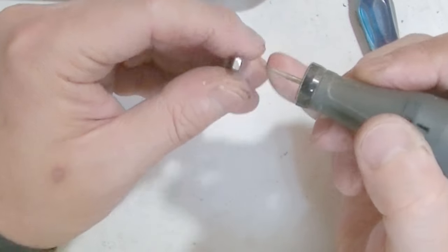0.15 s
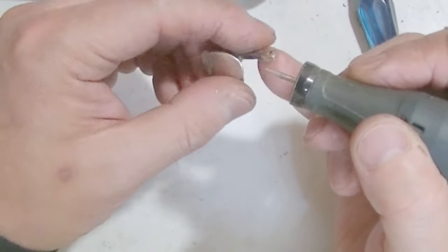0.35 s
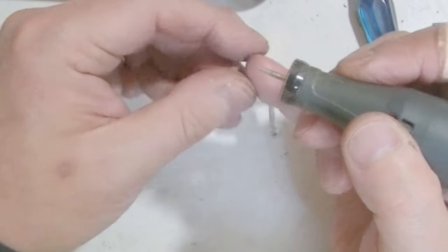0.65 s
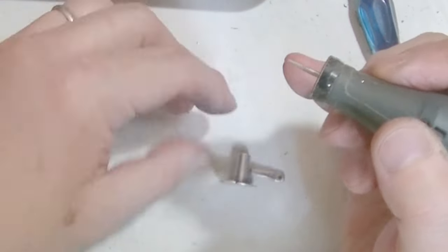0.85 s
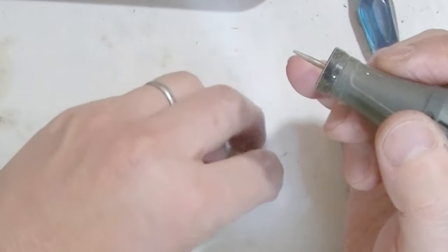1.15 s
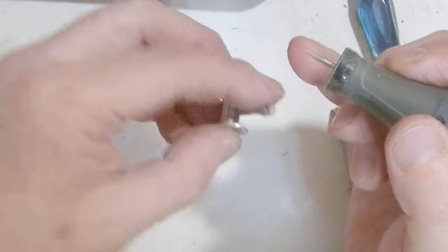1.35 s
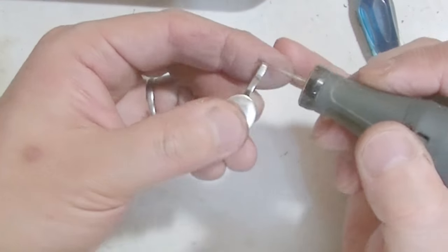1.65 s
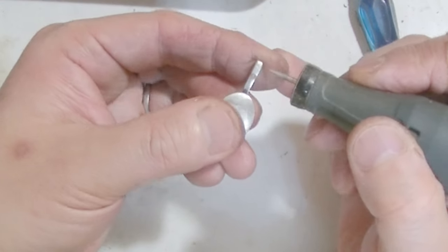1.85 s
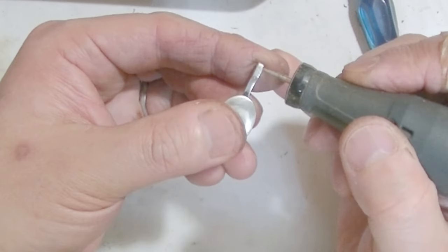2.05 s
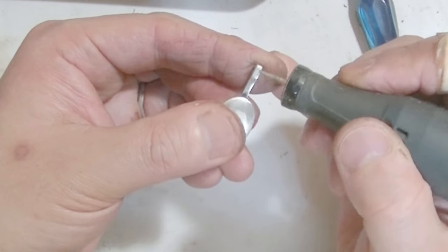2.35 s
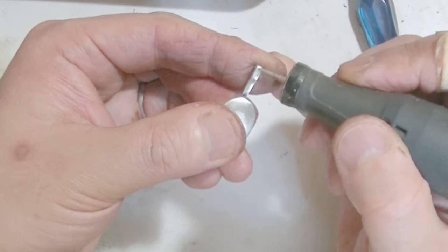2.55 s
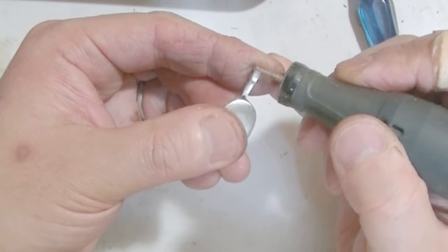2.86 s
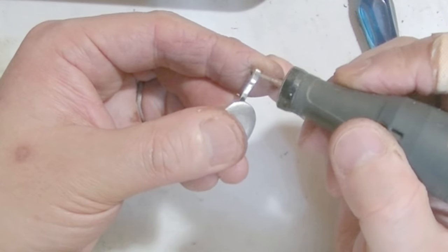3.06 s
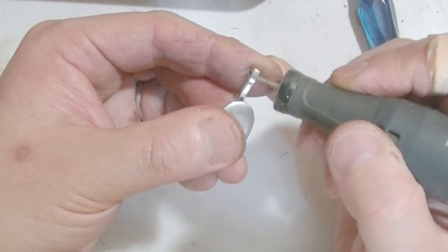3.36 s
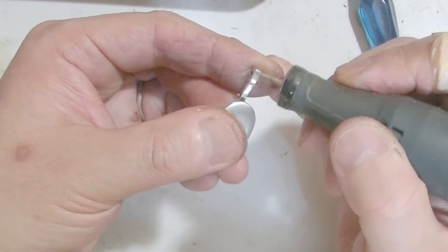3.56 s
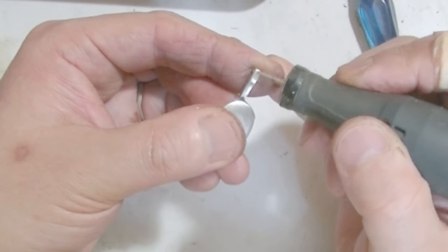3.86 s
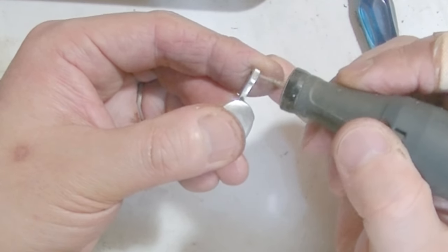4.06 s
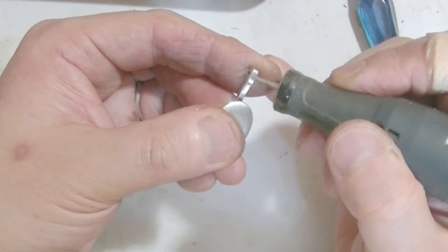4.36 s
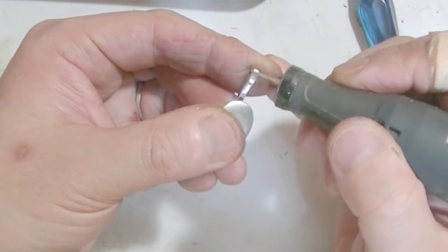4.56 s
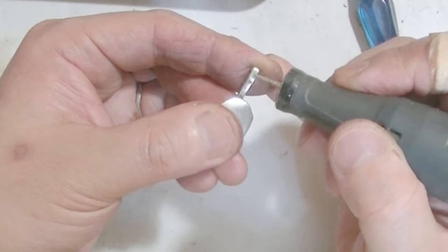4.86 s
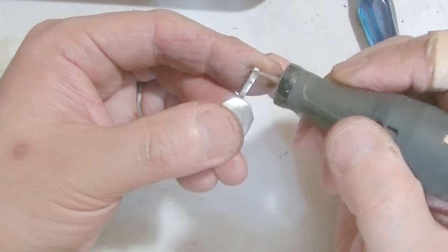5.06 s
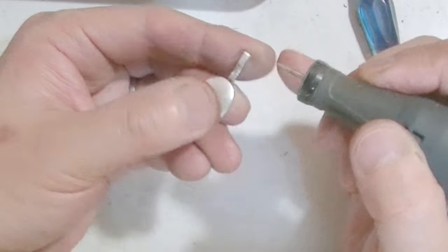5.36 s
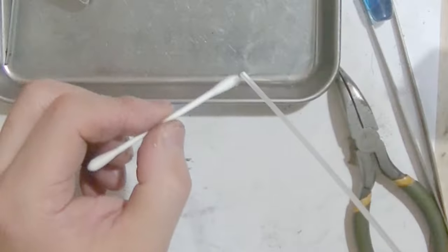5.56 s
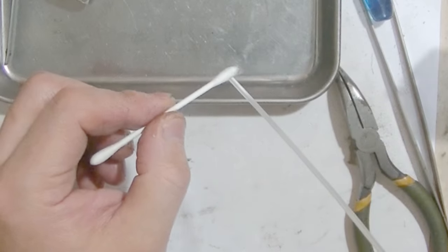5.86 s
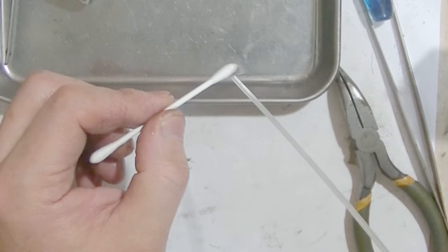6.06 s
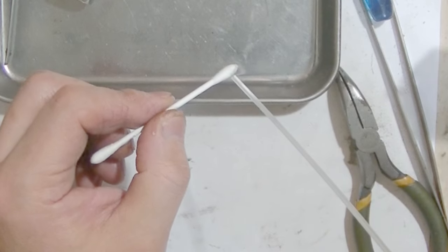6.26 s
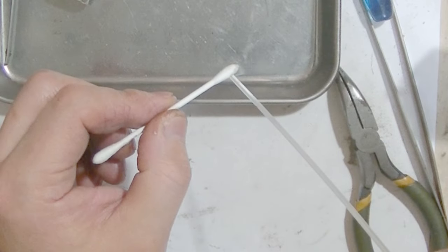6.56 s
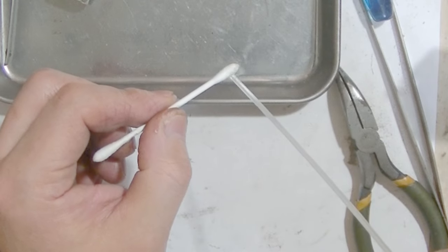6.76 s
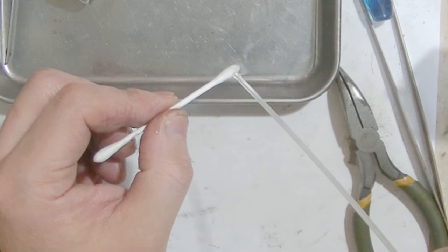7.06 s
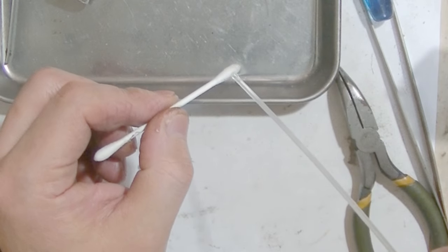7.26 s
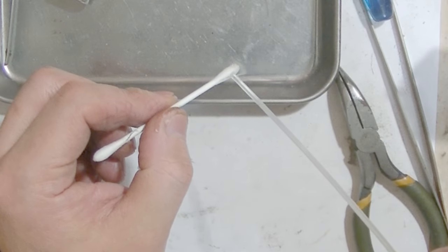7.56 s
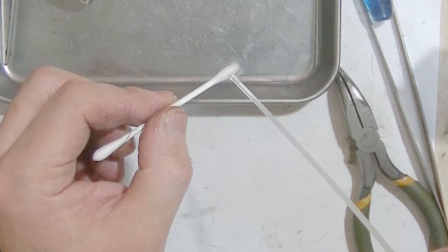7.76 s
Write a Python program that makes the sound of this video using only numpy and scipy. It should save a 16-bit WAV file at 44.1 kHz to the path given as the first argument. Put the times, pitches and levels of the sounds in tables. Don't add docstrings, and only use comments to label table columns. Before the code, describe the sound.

Close, dry workshop sound: a steady, high, many-toned motor whine with airy hiss and rattling bites of metal. Early on a small part falls, ticking and ringing briefly on a hard bench. The whine carries on, wavering slightly under pressure, then stops suddenly at a scene change. Soft cloth and a faint thud follow, then low hum and hush, and finally irregular scratchy, fizzing stick-slip rubbing with sharp little spits and snaps.

```python
import sys
import numpy as np
from scipy import signal
from scipy.fft import rfft, irfft
from scipy.io import wavfile
from scipy.ndimage import uniform_filter1d

SR = 44100
rng = np.random.default_rng(int(sys.argv[2]) if len(sys.argv) > 2 else 0)


def gain_from_db(level_db):
    decades = np.asarray(level_db, float) / 20
    return 10 ** decades


def generate_wav(signal):
    frames = np.transpose(np.atleast_2d(signal))
    scaled = np.clip(frames, -1, 1) * 32767
    pcm = np.round(scaled).astype(np.int16)
    wavfile.write(sys.argv[1], SR, pcm)


N = 349272
STEP = 64


def evened(x):
    return x / np.sqrt(np.mean(x ** 2) + 1e-20)


def read(points, hz):
    f, value = np.transpose(points)
    return np.interp(np.log(hz + 1), np.log(f + 1), value)


def curves(rows, outside=None):
    s, *columns = np.transpose(rows)
    return [np.interp(np.arange(N) / SR, s, c, outside, outside) for c in columns]


def fine(x):
    return np.interp(np.arange(N) / STEP, np.arange(len(x)), x)


def slow(hz, count):
    steps = rng.standard_normal((count, N // STEP + 1))
    b, a = signal.butter(1, hz * 2 * STEP / SR)
    return evened(signal.filtfilt(b, a, steps, padtype="even"))


def hump(t, centre, length):
    return np.cos(np.pi * np.clip((t - centre) / length, -.5, .5)) ** 2


def swells(s, length, height):
    t = np.arange(N // STEP + 1)[:, None] * STEP / SR
    return fine((height * hump(t, s, length)).sum(axis=1))


def colour(x, points):
    return irfft(rfft(x) * gain_from_db(read(points, np.fft.rfftfreq(N, 1 / SR))), N)


def pair(points, same):
    a, b = rfft(rng.standard_normal((2, N)))
    hz = np.fft.rfftfreq(N, 1 / SR)
    same = np.clip(same + 0.48 / (1 + (hz / 55) ** 2), 0, 1)
    both = np.array([a, same * a + np.sqrt(1 - same ** 2) * b])
    return evened(irfft(both * gain_from_db(read(points, hz)), N))


def resonate(x, hz, width):
    r = np.exp(-np.pi * width / SR)
    return signal.lfilter([1 - r, 0, r - 1], [1, -2 * r * np.cos(2 * np.pi * hz / SR), r * r], x)


def ring(modes, spread, pitch=1):
    t = np.arange(SR // 8) / SR
    x = np.zeros(len(t))
    for hz, db, t60 in modes:
        level = gain_from_db(db + spread * rng.standard_normal() - 60 * t / t60)
        x += level * np.sin(2 * np.pi * hz * pitch * rng.uniform(0.96, 1.01) * t)
    return x / abs(x).max()


def snap(hz, t60):
    puff = rng.standard_normal(SR // 16) * gain_from_db(-60 * np.arange(SR // 16) / SR / t60)
    puff = resonate(puff, hz, .5 * hz) + resonate(puff, 0.23 * hz, 0.077 * hz)
    puff = resonate(puff, 1.05 * hz, 2 * hz)
    return puff / abs(puff).max()


def add(mix, s, sound):
    part = mix[round(s * SR):][:len(sound)]
    part += sound[:len(part)]


def ports(x, side):
    smear = rng.standard_normal(2400) * np.exp(-np.arange(2400) / 500)
    smeared = signal.oaconvolve(x, smear / np.linalg.norm(smear))[:N]
    return x + colour(smeared, side) * np.array([[1], [-1]])


def walls(x, t60):
    t = np.arange(SR // 4) / SR
    tail = rng.standard_normal((2, len(t))) * gain_from_db(-60 * t / t60) * (t > .002)
    return signal.fftconvolve(x[None], tail / np.linalg.norm(tail[0]), axes=1)[:, :N]


def hum(lines, width):
    t = np.arange(N) / SR
    out = 0
    for hz, db in lines:
        level = fine(gain_from_db(db + 4.5 + 2.0 * slow(width, count=1)[0]))
        out = out + level * np.sin(2 * np.pi * (hz * t + rng.random((2, 1)) * 0.43))
    return out


# time_s, speed_hz (turns a second)
SHAFT_SPEED = [(0, 409.3), (0.13, 409.7), (0.2, 412.1), (0.35, 413.0), (1.52, 413.1), (1.62, 411.4),
               (2.25, 411.4), (2.45, 409.6), (2.65, 410.9), (2.95, 412.3), (3.3, 413.3), (3.95, 413.5),
               (4.35, 410.2), (4.6, 413.3), (4.95, 412.5), (5.1, 411.1), (5.35, 413.8), (5.55, 414.6)]
# centre_s, length_s, rattle_db, shank_ring_db, speed_sag_hz
BITES = [(0.041, 0.17, 7, 7, -1.5), (0.111, 0.087, 12, -4, 2), (2.366, 0.14, 8, -0.5, 2.5),
         (2.408, 0.063, 4, -1, 1), (2.53, 0.13, 6, -4, 1.36), (2.678, 0.16, 6, 4, -1.5),
         (2.765, 0.14, 6.5, 0, 3.5), (3.089, 0.097, 5, -11, 1.5), (3.475, 0.14, 8, 5, -0.36),
         (3.532, 0.15, -2, -3, 3), (3.743, 0.18, 6.5, -2, 2.5), (4.056, .1, 3, -1, -0.5),
         (4.161, 0.17, 3, -8, 2), (4.506, 0.18, 6.5, 10, 1.83), (5.053, 0.09, 5.5, 4, 2),
         (5.125, 0.18, 10, 5.5, 0.8), (5.267, 0.1, 3, 2, 2)]


def shaft():
    s, length, rattle_db, ring_db, sag_hz = np.transpose(BITES)
    speed = curves(SHAFT_SPEED)[0] - swells(s, length, sag_hz)
    turns = np.cumsum(speed) / SR + .0018 * fine(slow(35, count=1)[0])
    return speed, turns, swells(s, length, rattle_db), swells(s, length, ring_db)


# centre_s, level_db
SONGS = [(.1, -7), (3.09, -3), (3.18, 2), (3.54, 5), (3.73, 4), (4.07, 4), (4.18, -2), (4.29, 0.5),
         (4.41, 4), (4.78, 7.5), (5.0, 3.5), (5.19, 3.5), (5.28, 0), (5.48, 3.5)]


def strain(speed, ring_db, working):
    free_hz, song_s, turn_away_s = 413, .13, 2.3
    s, db = np.transpose(SONGS)
    turned_s = np.maximum(np.arange(N) / SR - turn_away_s, 0)
    sag_hz = (free_hz - speed) * working
    return np.array([sag_hz, ring_db, swells(s, song_s, db), turned_s, working])[:, ::STEP]


# centre_s, length_s, order, level_db
ORDER_SWINGS = [(0.065, 0.09, 8, 5.0), (0.075, 0.06, 12, -12.5), (0.12, 0.06, 12, 6.0), (0.135, 0.45, 9, 4.2),
                (0.165, 0.06, 12, -14.0), (0.254, 0.45, 18, -5.2), (0.294, 0.06, 17, 11.0),
                (0.344, 0.45, 5, -10.7), (0.554, 0.3, 18, -7.4), (1.078, 0.45, 17, 5.9), (1.482, 0.3, 18, 4.9),
                (1.596, 0.3, 14, 8.7), (1.816, 0.09, 18, 7.2), (2.04, 0.06, 18, 11.0), (2.34, 0.12, 11, 3.0),
                (2.34, 0.45, 11, 8.4), (2.439, 0.09, 12, -10.6), (2.454, 0.45, 10, -7.0),
                (2.464, 0.06, 11, -14.0), (2.5, 0.45, 8, 3.0), (2.619, 0.45, 11, 6.5), (2.679, 0.06, 20, -14.0),
                (2.769, 0.3, 10, -5.3), (2.779, 0.2, 12, -7.1), (2.78, 0.09, 8, 5.0), (2.928, 0.06, 12, -12.5),
                (2.968, 0.45, 11, 7.5), (3.003, 0.06, 10, -14.0), (3.128, 0.09, 10, -11.3),
                (3.263, 0.06, 10, -11.3), (3.357, 0.06, 11, 11.0), (3.497, 0.2, 12, -6.6),
                (3.512, 0.45, 10, -3.5), (3.642, 0.45, 18, -8.0), (3.712, 0.06, 14, -14.0),
                (3.761, 0.06, 10, -14.0), (4.141, 0.14, 14, 9.3), (4.156, 0.45, 11, 8.1),
                (4.215, 0.06, 10, -11.1), (4.27, 0.45, 9, 6.4), (4.335, 0.06, 11, 11.0), (4.395, 0.3, 7, -10.2),
                (4.41, 0.06, 11, 11.0), (4.425, 0.45, 12, -8.1), (4.739, 0.2, 10, -7.1), (4.754, 0.3, 5, -9.3),
                (5.078, 0.45, 11, 9.7), (5.138, 0.2, 12, -7.4), (5.358, 0.45, 17, 6.2), (5.433, 0.09, 14, -14.0)]


def swings_db(order, count):
    t = np.arange(count) * STEP / SR
    db = np.zeros(count)
    for centre, length, caught, gain_db in ORDER_SWINGS:
        if caught == order:
            db += 1.1 * gain_db * hump(t, centre, length)
    return db


# order, running_free_db, hand_closing_db, working_db
ORDER_LEVELS = [(1, -67, -70, -69), (2, -73, -73, -75), (3, -52, -52, -51), (4, -54, -53, -54),
                (5, -62, -75, -59), (6, -68, -65, -62), (7, -59, -62, -58), (8, -49, -49, -48),
                (9, -57, -53, -53), (10, -47, -47, -46), (11, -47, -56, -53), (12, -50, -55, -53),
                (13, -56, -75, -58), (14, -61, -50.5, -55), (15, -52, -51, -58), (16, -54, -55, -58),
                (17, -52, -51, -53), (18, -50, -48, -58), (19, -51, -53, -57), (20, -62, -57, -61),
                (21, -61, -61, -61), (22, -60, -58, -62), (23, -55, -61, -64), (25, -59, -63, -72),
                (30, -61, -58, -62), (33, -55, -58, -61), (34, -57, -58, -58), (35, -60, -54, -56),
                (36, -56, -49, -52)]
# order, sag_db_per_hz, ring_share, song_share, turning_db_per_s, working_db
ORDER_ANSWERS = [(5, 0.3, 0.24, 1.47, 0, 1.5), (7, 1.7, 0.74, 0, 1, -6), (8, .5, 0.99, 0.067, -0.36, -1.3),
                 (9, 2, 1, 0, -2, -3), (10, 0.4, -0.72, 1.4, 0.2, -2), (11, -0.5, 0.99, 0.69, -3.5, 1.5),
                 (12, 1.2, 0.024, 0.33, -0.5, 1), (14, 1, 0.33, 0.85, 0, -1.5)]


def whine(turns, grip, working, effort):
    grip, working = grip[::STEP], working[::STEP]
    levels = {round(row[0]): row[1:] for row in ORDER_LEVELS}
    answers = {round(row[0]): row[1:] for row in ORDER_ANSWERS}
    out, wander = np.zeros(N), slow(14, count=38)[:, :len(grip)]
    wander[4] = wander[9]
    wave, spin = 1, np.exp(2j * np.pi * turns)
    for order, w in enumerate(wander, 1):
        loose_db = .5 if order == 3 else 1.3 + .3 * working
        db = np.interp(grip, np.arange(3), levels[order]) if order in levels else -73
        db = db + loose_db * w + 0.042 * order + swings_db(order, len(grip))
        if order in answers:
            db = db + np.dot(answers[order], effort) + 0.17
        wave = wave * spin
        out += np.sqrt(2) * fine(gain_from_db(db)) * (wave * np.exp(2j * np.pi * rng.random())).imag
    return out


# pitch_hz, level_db (per Hz)
OPEN_HISS = [(500, -28.5), (1050, -28), (1450, -11), (1850, -4.5), (2300, -13), (2650, -15), (2900, -10.5),
             (3100, -5), (3800, 1.5), (5500, 1.5), (6200, 0), (7300, 1), (8800, 3), (10500, -1.5),
             (13500, -1), (15700, -4)]
# pitch_hz, level_db (per Hz)
SHADED_HISS = [(1000, -26), (1450, -8), (1850, -2), (2300, -10.5), (2620, -12.5), (2900, -9), (3100, -5.5),
               (3600, 2), (5300, 3), (6100, 0.5), (8100, 4), (10300, 0), (11600, 4), (13100, -2),
               (14700, 2.5), (15700, -0.5)]


def air_hiss(turns, grip, working):
    flutter = 1 + 0.15 * np.cos(2 * np.pi * turns)
    white = rng.standard_normal(N) * flutter * gain_from_db(0.77 * fine(slow(26, count=1)[0]))
    shaded = uniform_filter1d(np.clip(grip, 0, 1), size=4000)
    hiss = (1 - shaded) * evened(colour(white, OPEN_HISS))
    hiss += shaded * gain_from_db(0.46) * evened(colour(white, SHADED_HISS))
    housing = 1.3 * resonate(white, 7450, 500) * (1 - working)
    housing += .9 * resonate(white, 8150, 500) * shaded
    return hiss + housing


# pitch_hz, width_hz, level_db
PART_TONES = [(2140, 92, -1), (3490, 850, 3.5), (4270, 520, 5.5), (4670, 1400, -8)]


def part_rattle(turns):
    grinding = 0.85 * rng.standard_normal(N) * np.exp(-(turns % 1) / 0.43)
    blows = 3.3 * np.diff(np.floor(turns), prepend=0)
    knocks = (grinding + blows) * gain_from_db(2.0 * fine(slow(55, count=1)[0]))
    return evened(sum(gain_from_db(db) * resonate(resonate(knocks, hz, w), hz, w) for hz, w, db in PART_TONES))


# time_s, grip (0 free, 1 hand closing in, 2 working)
GRIP = [
    (0, 2),
    (.13, 2),
    (.16, 0),
    (1.56, 0),
    (1.72, 1),
    (2.17, 1),
    (2.25, 2),
    (5.6, 2),
]


def tool():
    speed, turns, force_db, ring_db = shaft()
    grip = curves(GRIP)[0]
    working = np.clip(grip - 1, 0, 1)
    out = whine(turns, grip, working, strain(speed, ring_db, working))
    out += gain_from_db(-35 + 0.22 * force_db) * air_hiss(turns, grip, working)
    return out + working * gain_from_db(-47.5 + force_db) * part_rattle(turns)


# pitch_hz, side_level_db
TOOL_SIDES = [(300, -21), (1500, -27), (2600, -23), (4500, -19.5), (8000, -18), (10500, -21.5),
              (13000, -8.5), (15500, -4.5)]


def heard_at_tool(x):
    return ports(x, TOOL_SIDES)


# pitch_hz, level_db (per Hz)
TOOL_ROOM = [(12, -59), (30, -20), (50, -9), (145, -9.5), (199, -6.5), (352, -7), (460, -2), (813, -3.5),
             (900, -5.5), (1100, 0), (1430, -52), (2420, -120)]
# pitch_hz, level_db
TOOL_HUM = [(102.3, -86), (199.2, -74.5), (301.5, -78.5)]


def tool_room():
    return gain_from_db(-65.5) * pair(TOOL_ROOM, 0.066) + hum(TOOL_HUM, 19.0)


# start_s, peak_db, knock_db, thud_db, ring_pitch (factor)
BOUNCES = [
    (0.7039, -9, -21, -54, 1.04),
    (0.7649, -16.5, -22.5, -71.5, 1),
    (0.7878, -16, -27.5, -66, 0.76),
    (0.8145, -12.5, -36, -74, 0.91),
    (0.9134, -10.5, -36, -55.5, 1.14),
]
# pitch_hz, level_db, t60_s
BENCH_TONES = [(560, -6.5, 0.046), (806, -3, 0.049), (1088, 5.5, 0.023), (1268, 8, 0.033), (1590, -12, .05),
               (1965, 8, 0.045), (2060, -5, 0.043)]
# pitch_hz, level_db, t60_s
LOOSE_PART_TONES = [(2750, -10, .02), (3110, 2, 0.023), (4280, 3, 0.016), (5000, -0.5, 0.01),
                    (5400, -8, 0.011), (6700, -1, 0.01), (9700, 1, 0.0098)]


def bounces():
    out, thuds = np.zeros((2, N))
    t = np.arange(SR // 8) / SR
    bright = signal.butter(4, 2500, "high", fs=SR, output="sos")
    for s, peak_db, knock_db, thud_db, pitch in BOUNCES:
        scatter, crack = rng.standard_normal((2, len(t)))
        scatter = resonate(scatter, 1630, 1500) * gain_from_db(-60 * t / 0.066)
        add(out, s + 0.00098, gain_from_db(knock_db + 5.5) * (ring(BENCH_TONES, 0.78) + 0.94 * scatter))
        crack = resonate(resonate(crack, 4600, 5200), 4800, 6000) * gain_from_db(-60 * t / 0.011)
        metal = ring(LOOSE_PART_TONES, 1.1, pitch) + 0.57 * crack
        add(out, s + 0.00107, gain_from_db(peak_db - 1.0) * signal.sosfilt(bright, metal))
        thud = gain_from_db(thud_db + 4.5 - 60 * t / 0.16) * np.sin(2 * np.pi * 190 * t)
        add(thuds, s, thud * np.minimum(t / 0.0037, 1))
    small_strikes(out)
    return signal.sosfilt(signal.butter(6, 520, "high", fs=SR, output="sos"), out) + thuds


# start_s, peak_db, pitch_hz, t60_s
STRIKES = [
    (5.5035, -20, 7500, 0.0058),
    (5.5035, -31, 1600, 0.014),
    (.8225, -30, 4200, .008),
    (0.92, -33, 3800, .008),
    (.937, -32, 3000, .008),
]


def small_strikes(out):
    t = np.arange(SR // 8) / SR
    for s, peak_db, hz, t60 in STRIKES:
        add(out, s, gain_from_db(peak_db) * snap(hz, t60))
    add(out, STRIKES[0][0], gain_from_db(-24 - 60 * t / 0.036) * np.sin(2 * np.pi * 8300 * t))


# pitch_hz, level_db (per Hz)
QUIET_ROOM = [(12, -41), (20, -13), (150, -13.5), (210, -9.5), (357, -11), (399, -12), (542, -15.5),
              (1000, -18), (1440, -20.5), (10500, -28.5), (16000, -37.5)]
# pitch_hz, level_db
QUIET_HUM = [(48.4, -83), (113.0, -74), (150.7, -69.5), (253.0, -76), (349.9, -80.5)]


def quiet_room():
    return gain_from_db(-57) * pair(QUIET_ROOM, 0.015) + hum(QUIET_HUM, 6.1)


# time_s, cloth_db, thud_db
RUSTLE = [
    (5.515, -58, -62),
    (5.519, -56, -54.5),
    (5.569, -55.5, -59.5),
    (5.603, -77, -52),
    (5.68, -81, -75),
]


def settling():
    cloth_db, thud_db = curves(RUSTLE, -120)
    cloth = pair([(600, -29.0), (1800, 8), (4000, -4.0), (8000, -2.0), (12000, -22)], 0.48)
    return gain_from_db(cloth_db) * cloth + gain_from_db(thud_db + 0.5) * np.sin(2 * np.pi * 100 * np.arange(N) / SR)


# start_s, peak_db, fizz_db, t60_s
SLIPS = [(6.555, -23, -24, 0.062), (6.573, -24, -21, 0.066), (6.605, -20.5, -17, 0.043),
         (6.628, -31, -16, 0.064), (6.645, -23, -16, 0.07), (6.6756, -21, -13, 0.023),
         (6.6844, -38, -12, 0.034), (6.7047, -39, 0, 0.084), (6.582, -31, -17, .03),
         (6.593, -28, -15, 0.028), (6.755, -23.5, -3, 0.07), (6.7844, -26.5, -15, 0.15),
         (6.86, -20, -6.5, 0.026), (6.8992, -27, -13, 0.088), (6.9496, -30, -19, 0.062),
         (6.999, -30, -8, 0.16), (7.0688, -25, -11, 0.17), (7.0994, -35, -2, 0.07), (7.1844, -32, -7, 0.17),
         (7.2524, -26.5, -12, 0.19), (7.3786, -38, -12, 0.061), (7.4924, -36, -15, 0.07),
         (7.5502, -26, -22, 0.072), (7.5958, -26.5, -10, 0.055), (7.6445, -32, -15, 0.12),
         (7.677, -28, -15, 0.081), (7.7077, -23, -11, 0.066), (7.7494, -39, -19, 0.044),
         (7.879, -36, -16, 0.07)]


def slips(low, high):
    t = np.arange(SR // 16) / SR
    for s, peak_db, fizz_db, t60 in SLIPS:
        add(low, s, gain_from_db(peak_db - 22.0 - 60 * t / t60) + gain_from_db(peak_db - 30 - 60 * t / 0.0068))
        add(high, s, (1 - np.exp(-t / 0.0029)) * gain_from_db(peak_db + fizz_db - 5.5 - 60 * t / (1.1 * t60)))


# release_s, build_up_s, level_db
DRAGS = [(6.55, 0.086, -59), (6.69, .04, -47), (6.81, 0.034, -47), (6.88, .03, -52), (6.932, 0.036, -48),
         (7.12, .05, -47), (7.24, .05, -56), (7.39, .02, -50), (7.5, 0.015, -55), (7.565, 0.035, -53),
         (7.62, .03, -47), (7.70, 0.048, -45), (7.728, .02, -45), (7.754, .02, -48), (7.82, 0.025, -52),
         (7.915, .04, -50)]


def drags(low, high):
    for s, build, db in DRAGS:
        rise = np.arange(0, build, 1 / SR) / build
        left_s = (1 - rise) * build
        add(high, s - build, gain_from_db(db) * rise ** 1.5 * np.minimum(left_s / 0.0022, 1))
        add(low, s - build, gain_from_db(db - 9) * rise ** 0.67 * np.minimum(left_s / 0.0037, 1))


# start_s, peak_db, pitch_hz
SPITS = [(6.5542, -46, 5310), (6.5727, -38, 5920), (6.6041, -34, 5420), (6.627, -41, 5060),
         (6.643, -33, 5770), (6.6849, -30, 6050), (6.7054, -35, 5070), (6.741, -12, 6000),
         (6.8026, -36, 5710), (6.857, -34, 5120), (6.864, -29, 5220), (6.8914, -38, 5840),
         (6.9224, -38, 5710), (6.9493, -40, 5080), (6.9723, -40, 5750), (6.9927, -33, 5390),
         (7.0316, -32, 5840), (7.069, -25, 5710), (7.1279, -31, 5890), (7.1533, -30, 5010),
         (7.1908, -31, 5490), (7.2157, -27, 5190), (7.2446, -35, 5750), (7.2786, -29, 5000),
         (7.3399, -39, 5930), (7.378, -34, 5060), (7.4487, -45, 5730), (7.4976, -36, 5790),
         (7.4976, -36, 10900), (7.522, -42, 5400), (7.5465, -38, 5080), (7.595, -33, 5390),
         (7.6577, -36, 5440), (7.6885, -29, 5410), (7.7116, -32, 5740), (7.7245, -29, 5730),
         (7.749, -39, 6000), (7.7974, -39, 5870), (7.8473, -42, 5370), (7.8812, -40, 5380),
         (7.9031, -32, 5920)]
# start_s, peak_db, pitch_hz, t60_s
SNAPS = [
    (6.15, -41, 490, .03),
    (6.7405, -19, 5600, .018),
    (6.7405, -20, 2600, .02),
    (7.6765, -30, 5700, .015),
    (7.8235, -26, 4200, .025),
    (7.8275, -31, 3000, .02),
    (7.8235, -30, 1350, .05),
]


def spits(out):
    for s, peak_db, hz in SPITS:
        tick = gain_from_db(peak_db - 1.5) * snap(hz, 0.011) + gain_from_db(peak_db - 10) * snap(0.5 * hz, 0.011)
        add(out, s + 0.00081, tick)
    for s, peak_db, hz, t60 in SNAPS:
        add(out, s + 0.001199, gain_from_db(peak_db) * snap(hz, t60))


# time_s, pressure_db
PRESSURE = [(6.4, -82), (6.53, -65), (6.56, -67), (6.7, -42), (6.8, -45.5), (7.1, -44), (7.38, -44),
            (7.43, -49), (7.7, -46), (7.92, -44.5)]
# pitch_hz, level_db (per Hz)
SCRATCH_BODY = [(150, -35), (250, -5), (509, -5.5), (769, 0), (926, -10), (1010, -3), (1180, -12.5),
                (1660, 2), (1970, 1), (3190, 2), (3680, -8), (5810, 2), (6600, -18), (7500, -11),
                (9750, -30), (16500, -120)]
# pitch_hz, level_db (per Hz)
SCRATCH_FIZZ = [(5000, -18), (6500, -7), (7800, 0.5), (9000, -4.5), (10800, 1), (11700, -8), (12500, -2.5),
                (14000, -9), (15700, -8)]


def rubbing():
    pressure_db = curves(PRESSURE)[0]
    fizz_db = -8 + 0.35 * (pressure_db + 44.5)
    on = np.clip((np.arange(N) / SR - PRESSURE[0][0]) / .08, 0, 1)
    small = (rng.random(N) < 260 / SR) * gain_from_db(1.1 * np.minimum(rng.exponential(1, N), 3))
    clumps = .5 + signal.lfilter([1], [1, -np.exp(-1 / (0.00043 * SR))], small)
    clumps /= uniform_filter1d(clumps, size=1500)
    grit = rng.standard_normal((2, N)) * gain_from_db(2.0 * rng.standard_normal(N))
    low = on * gain_from_db(pressure_db - 0.5) * clumps ** 1.03
    high = on * gain_from_db(pressure_db + fizz_db - 2.0) * clumps ** 1.67
    slips(low, high)
    drags(low, high)
    out = np.zeros(N)
    for g, level, spectrum in zip(grit, (low, high), (SCRATCH_BODY, SCRATCH_FIZZ)):
        out += colour(g * level, spectrum) / colour(g, spectrum).std()
    spits(out)
    return out


# pitch_hz, width_hz, level_db
TRAY_TONES = [(2135, 31, 2.5), (2760, 63, -5), (3190, 61, -7), (3500, 18, 13), (3920, 69, 5),
              (4510, 83, -17), (5050, 180, 0), (5700, 45, -8), (5950, 300, -3.5)]


def with_tray(rub):
    return rub + 0.79 * sum(gain_from_db(db) * resonate(rub, hz, w) for hz, w, db in TRAY_TONES)


# pitch_hz, side_level_db
TRAY_SIDES = [(300, -0.5), (1500, -11.5), (3000, -54), (4500, -12), (5500, -27), (7000, 0), (9000, -14),
              (11000, -15)]


def heard_at_tray(x):
    return ports(x, TRAY_SIDES)


def scene():
    change_s = 5.509
    first = np.clip((change_s - np.arange(N) / SR) / 0.0044 + .5, 0, 1)
    near, hits = tool(), bounces()
    before = heard_at_tool(near + hits) + gain_from_db(-15) * walls(hits, 0.024) + tool_room()
    after = gain_from_db(-2.5) * heard_at_tray(with_tray(rubbing())) + settling() + quiet_room()
    return first * before + np.sqrt(1 - first ** 2) * after


def low_pass(x):
    return signal.sosfilt(signal.butter(12, 17090, fs=SR, output="sos"), x)


def record(dry):
    power_db = 10 * np.log10(uniform_filter1d(dry.mean(0) ** 2, size=200) + 1e-12)
    fall = np.arange(N) * 53.0 / SR
    over_db = np.maximum(np.maximum.accumulate(power_db + fall) - fall + 28.0, 0)
    ducked = dry / gain_from_db(0.22 * uniform_filter1d(over_db, size=300, origin=149))
    edge = signal.firwin(767, 15760, window=("kaiser", 9), fs=SR)
    return low_pass(signal.oaconvolve(ducked, edge[None], "same"))


dry = scene()
out = record(dry)
generate_wav(out)
```